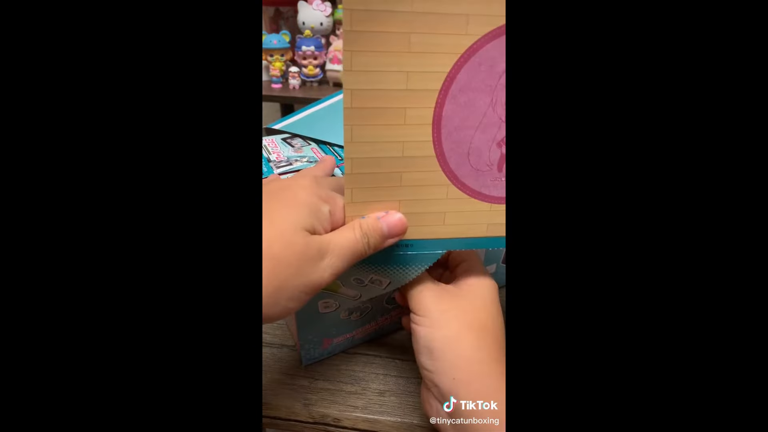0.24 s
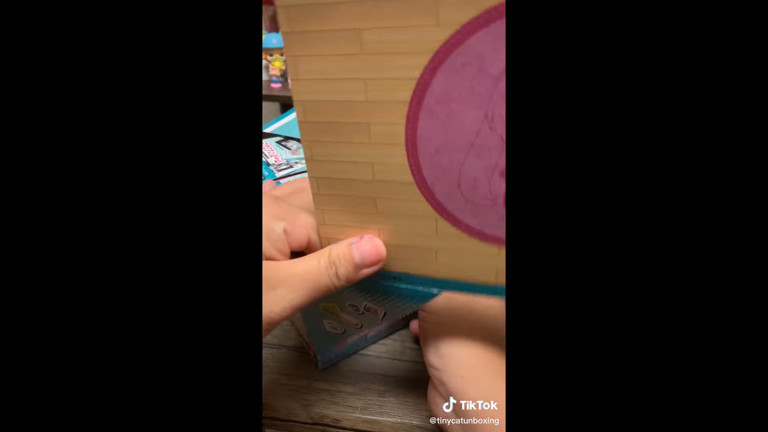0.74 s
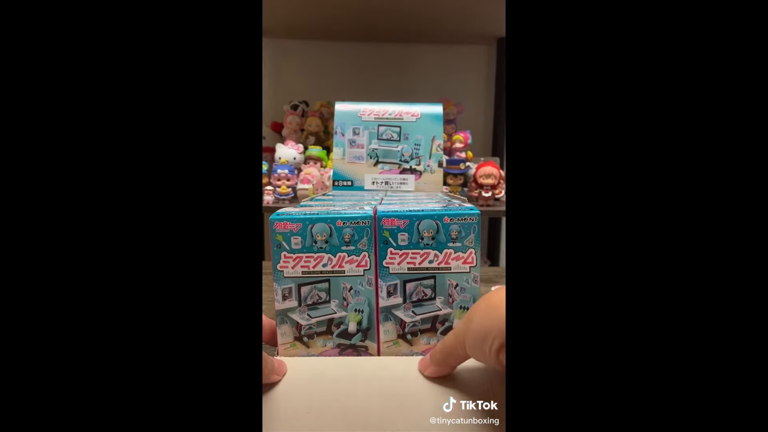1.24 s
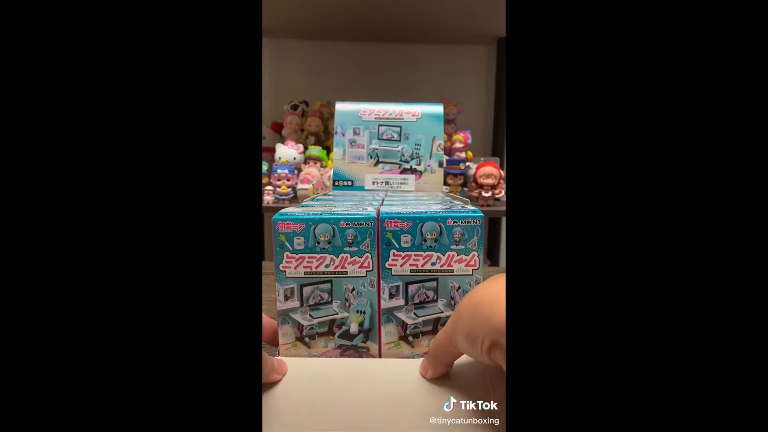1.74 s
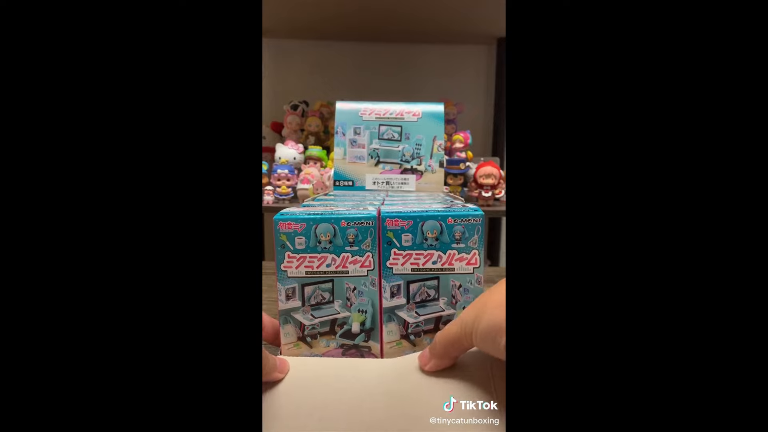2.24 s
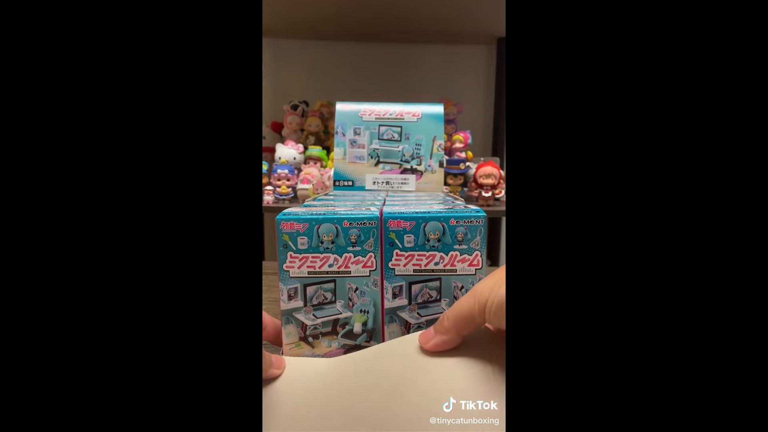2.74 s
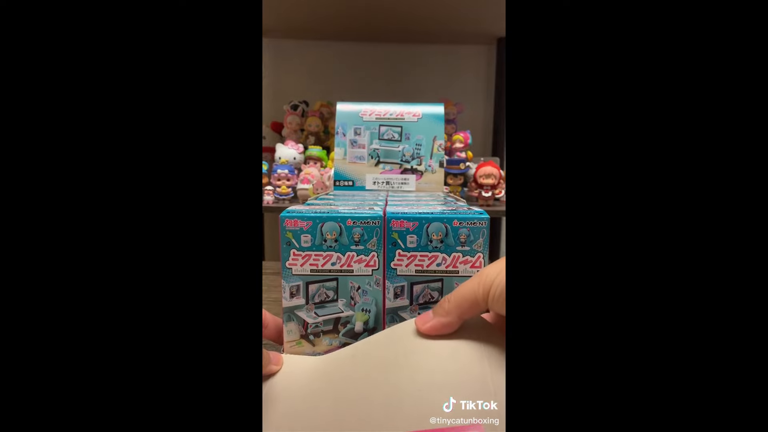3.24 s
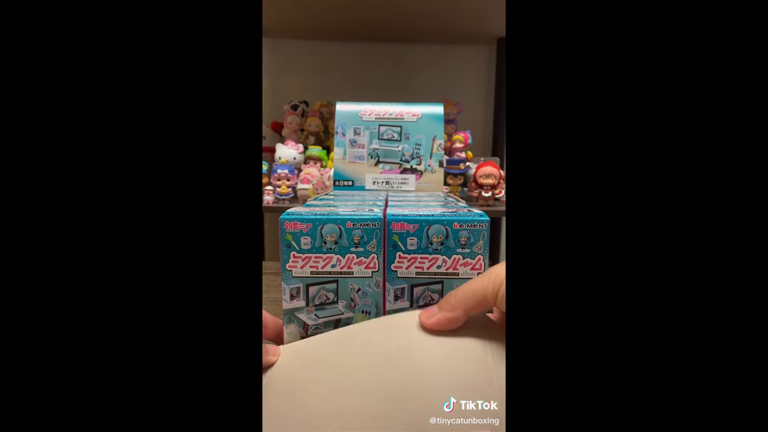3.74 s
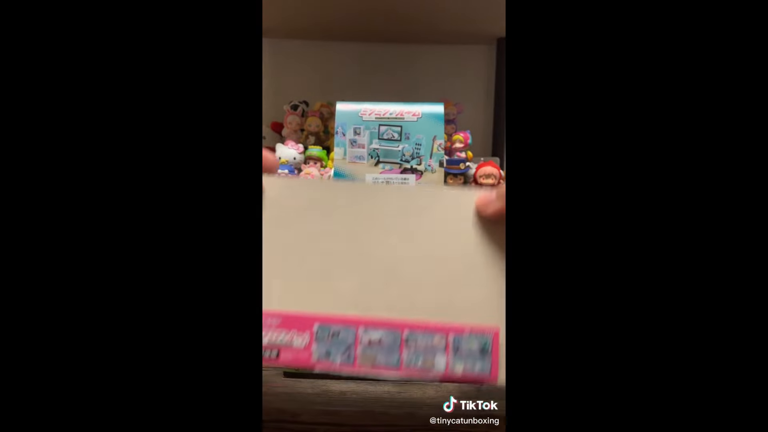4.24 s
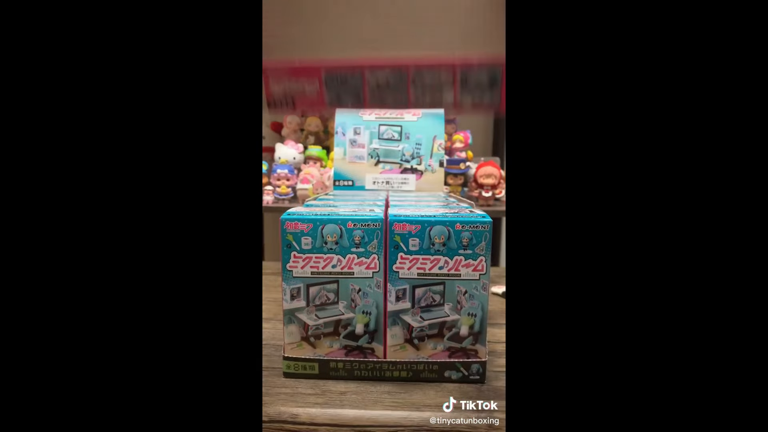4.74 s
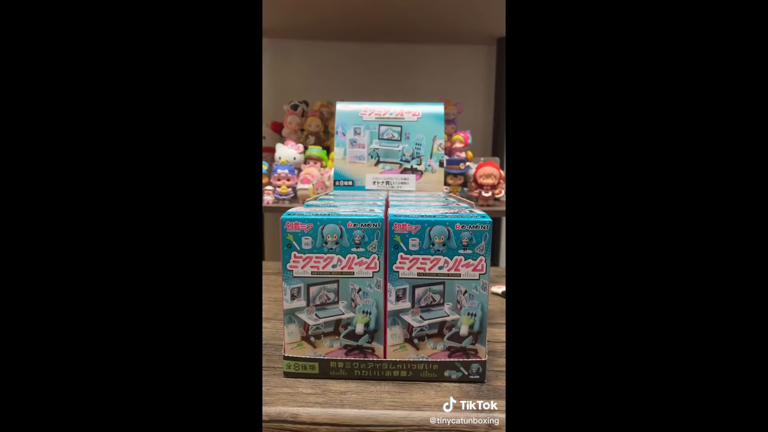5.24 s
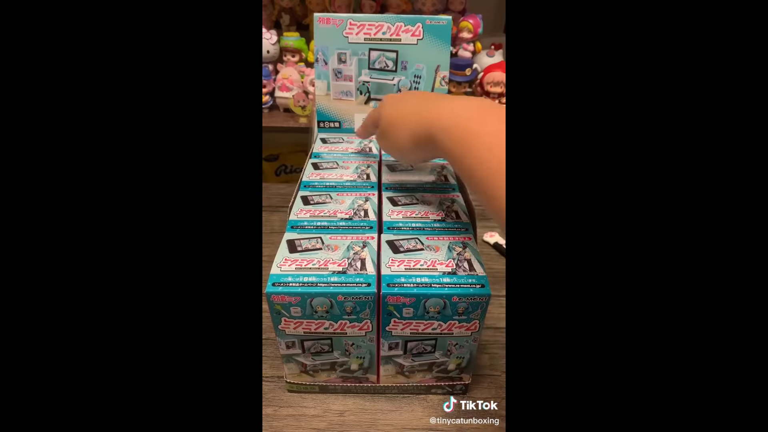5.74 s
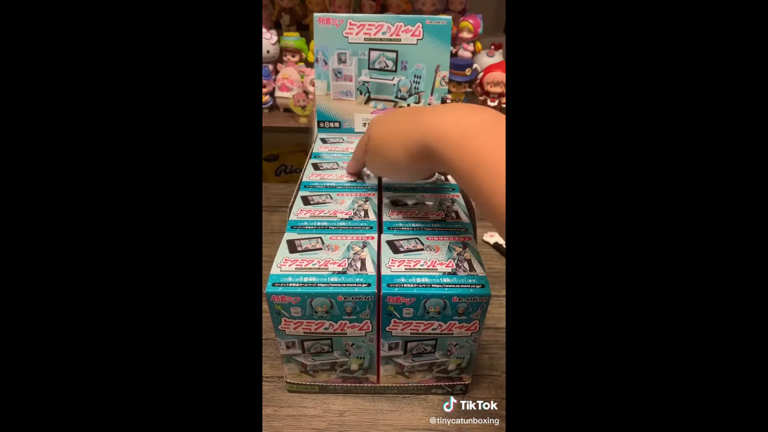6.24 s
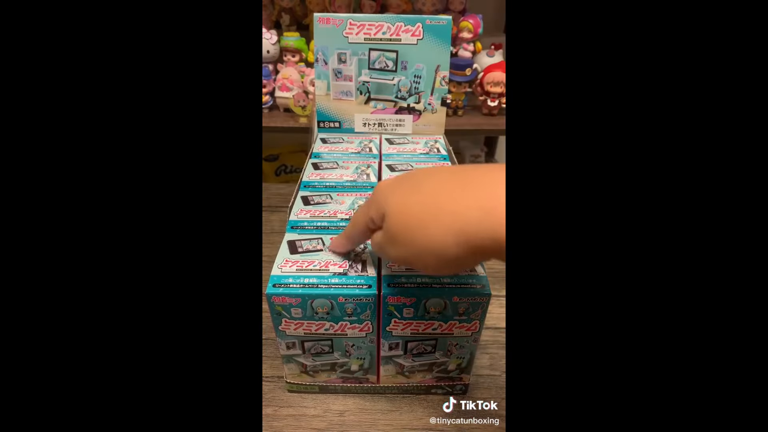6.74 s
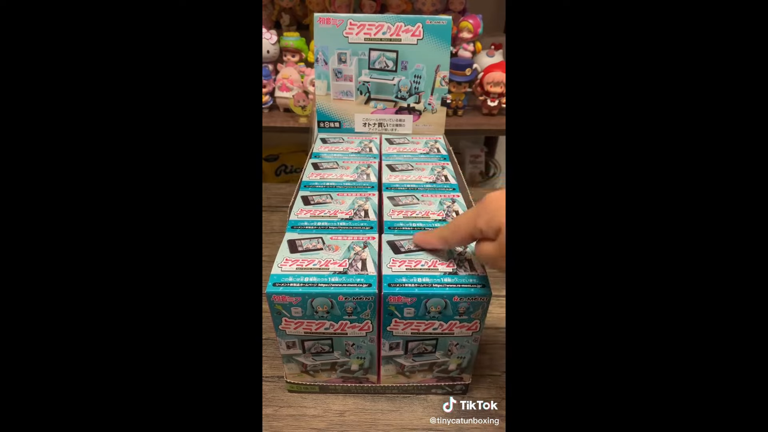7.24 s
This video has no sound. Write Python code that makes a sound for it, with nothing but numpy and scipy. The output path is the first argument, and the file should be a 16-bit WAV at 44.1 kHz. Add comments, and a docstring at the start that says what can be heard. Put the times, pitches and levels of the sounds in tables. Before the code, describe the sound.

Hands open a stiff cardboard box on a table. A brief crackling tear gives way to a lull, then irregular bursts of bright, woody snaps, loudest near the middle, with skin scraping on card between them. Then much quieter handling, tiny knocks on hollow cartons, and a thin uneven hiss of a finger drawn across their lids. Recorded close in stereo in a small, fairly dead room with low rumble.

```python
"""At a table in a small furnished room, fingers tear the perforated front off a cardboard box, tab by tab.
Each tab is a short noise burst that rings the stiff card, cracks brightly and thumps the panel.
Skin and card rub softly as coloured, grainy noise; now and then fingers knock on small hollow cartons.
Near the end a fingertip slides over the carton tops. Low rumble and a faint hiss lie underneath."""
import sys
import numpy as np
from scipy import signal
from scipy.fft import rfft, irfft
from scipy.io import wavfile
from scipy.ndimage import uniform_filter1d, map_coordinates

SR = 44100
rng = np.random.default_rng(int(sys.argv[2]) if len(sys.argv) > 2 else 0)


def generate_wav(signal):
    """Clip the signal to [-1, 1] and save it as 16-bit WAV at the path in sys.argv[1]."""
    frames = np.transpose(np.atleast_2d(signal))
    scaled = np.clip(frames, -1, 1) * 32767
    pcm = np.round(scaled).astype(np.int16)
    wavfile.write(sys.argv[1], SR, pcm)


N = 330750
SIDES = np.array([[1], [-1]])  # left, right


def undb(db):
    """Turns decibels into a plain factor."""
    return 10 ** (np.asarray(db) / 20)


def peak(x):
    """Scales a sound so that its highest peak is 1."""
    return x / np.abs(x).max()


def unit(x):
    """Scales a sound to an average (RMS) level of 1."""
    return x / np.sqrt(np.mean(x ** 2))


def add(out, start_s, sound):
    """Mixes a sound into the scene; what lies before the beginning or after the end is cut."""
    start = int(start_s * SR)
    sound = np.atleast_2d(sound)[:, max(-start, 0):N - start]
    first = max(start, 0)
    out[:, first:first + sound.shape[1]] += sound


def colour(x, table, share=1):
    """Weights the spectrum by (Hz, dB) points, joined by straight lines over log frequency."""
    table_hz, table_db = np.transpose(table)
    length = x.shape[-1]
    hz = np.maximum(np.arange(length // 2 + 1) * SR / length, 1)
    gain_db = np.interp(np.log(hz), np.log(table_hz), table_db)
    return irfft(rfft(x) * undb(share * gain_db), length)


def ring(x, hz, width_hz):
    """A resonance that passes its own pitch with gain 1."""
    return signal.lfilter(*signal.iirpeak(hz, hz / width_hz, fs=SR), x)


def steep(x, hz, width_hz):
    """The same resonance twice, which leaves dark valleys beside it."""
    return ring(ring(x, hz, width_hz), hz, width_hz)


def walk(rate):
    """Wandering random levels, rate new ones a second, smoothed twice; their spread is near 1."""
    hold = int(SR / rate)
    steps = np.repeat(rng.standard_normal(N // hold + 1), hold)
    return 1.3 * uniform_filter1d(uniform_filter1d(steps, hold), hold)[:N]


def curves(table):
    """Draws each level column against the seconds in the first; outside them it is -120 dB."""
    s, *columns = np.transpose(table)
    return [np.interp(np.arange(N) / SR, s, c, left=-120, right=-120) for c in columns]


# What differs between the two microphone ports.
# Each row: frequency in Hz, level in dB against the sound they share.
PORT_DIFFERENCE = [(300, -10), (1500, -5.5), (2900, -2.5), (3600, -4), (4500, -3), (6900, -11.5),
                   (9000, -1.5), (13000, -3)]


def pair(mid, side):
    """Left and right from two unrelated signals: alike in the bass, further apart in the treble."""
    return mid + SIDES * colour(side, PORT_DIFFERENCE)


def noise(table):
    """Steady stereo noise of a given colour, at an average level of 1."""
    mid, side = colour(rng.standard_normal((2, N)), table)
    return unit(pair(mid, side))


# Colour of the low rumble. Each row: frequency in Hz, strength in dB per Hz.
HUM_COLOUR = [(15, -39.5), (25, -13), (65, -5.5), (91, -21), (124, -17.5), (160, -35.5), (198, -25.5),
              (254, -39.5), (500, -60), (650, -93), (1100, -120)]
# Loudness of the rumble. Each row: time in seconds, level in dB.
HUM_LEVEL = [(0.0, -67), (0.19, -54.5), (0.6, -63.5), (1.15, -55), (2.28, -56), (2.57, -50), (2.94, -58.5),
             (3.34, -56.5), (4.16, -64), (4.61, -59), (5.22, -60.5), (5.83, -65), (7.33, -63.5), (7.5, -59)]
# Colour of the faint steady hiss. Each row: frequency in Hz, strength in dB per Hz.
AIR_COLOUR = [(290, -38), (500, -10), (659, -9.5), (1790, -4), (6230, -5), (9920, -14), (12700, -3),
              (15600, -12), (16000, -49.5)]
AIR_DB = -82.5


def hum():
    """Low rumble of the house and the table, as noise of changing level, over a faint steady hiss."""
    hum_db = np.interp(np.arange(N) / SR, *np.transpose(HUM_LEVEL))
    return noise(HUM_COLOUR) * undb(hum_db) + noise(AIR_COLOUR) * undb(AIR_DB)


# Echoes of the room, band by band.
# Each row: centre in Hz, seconds to fade by 60 dB, level in dB.
ROOM_BANDS = [(152, 0.18, -8), (435, 0.13, -4), (1000, 0.18, -12), (1840, 0.12, -19), (3307, 0.14, -13),
              (6600, .12, -18.5), (11200, 0.067, -12.5)]


def room(x):
    """Dense echoes, made of noise that fades band by band, partly different at the two ports."""
    t = np.arange(16384) / SR
    echoes = pair(*rng.standard_normal((2, len(t)))) * (1 - np.exp(-t / 0.00033))
    tail = 0
    for hz, t60, db in ROOM_BANDS:
        fade = 1000 ** (-t / t60)
        tail = tail + undb(db) * ring(echoes, hz, 0.72 * hz) * fade / np.sqrt(np.sum(fade ** 2))
    mono = x.mean(axis=0, keepdims=True)
    return signal.fftconvolve(mono, tail, axes=1)[:, :N]


PATCH_DB, PATCH_S, PATCH_OCTAVES = 3.5, 0.084, 0.15  # spread in the bass, and size, of the colour patches
PATCH_TOP_HZ = 3520  # around and above this the spread shrinks


def patchy(x):
    """Narrow bands of the rubbing and of the echoes swell and sink at random."""
    hz, s, spectrum = signal.stft(x, SR, nperseg=512)
    grid = np.meshgrid(np.log2(1 + hz / 100) / PATCH_OCTAVES, s / PATCH_S, indexing="ij")
    patches = map_coordinates(rng.standard_normal((64, 256)), grid, mode="mirror")
    spread_db = PATCH_DB / np.sqrt(1 + (hz[:, None] / PATCH_TOP_HZ) ** 2)
    return signal.istft(spectrum * undb(spread_db * patches), SR, nperseg=512)[1][:, :N]


# The freed card rustles on after each snap; the rows are hiss, scrape and panel drone.
# Each row: level in dB against the snap's treble, card ring or thump, seconds to fade by 60 dB.
SETTLE_FADES = [(-31, 0.18), (-30, 0.27), (-15, 0.13)]


def settling():
    """Levels of three colours dying away after every snap; a bright snap leaves a bright rustle."""
    kicks = np.zeros((3, N))
    for s, db, treble_db, *_, thump_db, _ in SNAP_EVENTS:
        kicks[:, int(s * SR)] += undb([db + treble_db, db, db + thump_db]) ** 2
    levels = []
    for kick, (db, t60) in zip(kicks, SETTLE_FADES):
        power = signal.lfilter([1], [1, -1000 ** (-2 / (t60 * SR))], kick)
        levels.append(undb(db) * np.sqrt(power))
    return np.array(levels)


SCUFF_EDGE_DB, SCUFF_ROUND = -24, 1.136  # level at the ends of swell and fade; 1 pointed, 2 rounded top
HOLLOW_WIDTH, HOLLOW_REF_HZ = .42, 1500  # width as a share of this pitch; higher rings are looser
# Hands shifting on the card, with levels before the grain of the rubbing is added.
# Each row: loudest moment in seconds, swell in seconds, fade in seconds, scrape in dB, hiss in dB,
# panel drone in dB, hollow ring in Hz, hollow ring in dB.
SCUFF_EVENTS = [(.03, 0.044, 0.095, -91, -64.5, -47, 1020, -53),
                (.22, 0.19, 0.19, -54.5, -53.5, -58, 808, -52),
                (0.348, 0.11, 0.16, -81, -104, -47, 733, -60.5),
                (0.599, 0.1, 0.38, -69, -68, -96, 2110, -70.5),
                (0.703, 0.057, 0.063, -55.5, -56, -50.5, 2030, -64),
                (0.834, 0.07, 0.074, -59, -93, -62, 1700, -76),
                (1.02, 0.11, 0.12, -68.5, -62.5, -79, 1940, -64.5),
                (1.098, 0.04, 0.0063, -66, -84, -58, 1535, -80),
                (1.17, 0.034, 0.026, -79, -66, -71, 1590, -71),
                (1.24, 0.033, 0.09, -90, -101, -65, 1840, -72),
                (1.361, 0.053, 0.081, -48, -45.5, -44, 1570, -57.5),
                (1.694, 0.17, 0.35, -66, -65, -64, 850, -67),
                (1.822, 0.078, 0.015, -55.5, -60, -51.5, 840, -63),
                (2.173, 0.023, 0.022, -61, -56.5, -60.5, 2450, -74),
                (2.223, 0.032, 0.011, -53.5, -56, -54.5, 978, -76),
                (2.399, 0.056, 0.078, -63, -60, -58.5, 2350, -73.5),
                (2.635, 0.0093, 0.051, -56, -60, -57, 1220, -65),
                (2.828, 0.056, 0.11, -76, -88, -68.5, 1308, -69),
                (3.16, 0.21, 0.41, -64.5, -73, -73.5, 2348, -80),
                (3.371, 0.09, 0.097, -67.5, -76.5, -74, 1680, -70),
                (3.638, 0.023, 0.14, -63.5, -64.5, -57, 1460, -70),
                (3.75, 0.14, 0.11, -68, -57, -73.5, 1495, -68),
                (3.846, .016, .03, -91, -100, -69, 812, -64),
                (3.935, 0.21, 0.059, -67.5, -73, -74, 1064, -66.5),
                (4.058, 0.045, 0.047, -68.5, -78, -59.5, 1450, -60.5),
                (4.145, 0.013, 0.049, -82, -99, -66, 1720, -72),
                (4.349, 0.022, 0.066, -69, -80, -62.5, 1720, -63),
                (4.455, 0.043, 0.08, -63, -66, -58.5, 823, -69),
                (4.539, 0.072, 0.02, -67.5, -69, -88, 1570, -62.5),
                (4.61, 0.018, 0.04, -95, -91, -70, 1584, -74),
                (5.08, .015, 0.037, -87.5, -73.5, -80, 1682, -95),
                (5.28, 0.27, 0.027, -67.5, -72.5, -67, 1620, -74),
                (5.418, 0.015, 0.13, -58, -89, -57, 3770, -57.5),
                (5.56, 0.0093, 0.12, -55.5, -87, -59.5, 4000, -54.5),
                (5.733, 0.03, 0.088, -65, -88.5, -56.5, 952, -73)]


def scuffs():
    """Each scuff swells and fades: three noise levels, and noise ringing the gap under the hand."""
    t, levels, hollow = np.arange(N) / SR, np.zeros((3, N)), np.zeros((2, N))
    air = pair(*rng.standard_normal((2, N)))
    for s, swell_s, fade_s, scrape_db, hiss_db, drone_db, hz, hollow_db in SCUFF_EVENTS:
        near = slice(max(int((s - 4 * swell_s) * SR), 0), int((s + 4 * fade_s) * SR))
        away = np.maximum((s - t[near]) / swell_s, (t[near] - s) / fade_s)
        shape = undb(SCUFF_EDGE_DB * away ** SCUFF_ROUND)
        levels[:, near] += undb([[hiss_db], [scrape_db], [drone_db]]) * shape
        width_hz = HOLLOW_WIDTH * hz ** 2 / HOLLOW_REF_HZ
        hollow[:, near] += undb(hollow_db) * shape * unit(steep(air[:, near], hz, width_hz))
    return levels + settling(), hollow


TICKS_PER_S, TICK_S, TICK_DB = 180, 0.0018, -5  # fibres that catch and let go
# Colours of the hiss, the scrape and the panel drone. Each row: frequency in Hz, strength in dB per Hz.
RUSTLE_COLOUR = [(2940, -33), (5000, -5), (7100, -2.5), (9880, -12), (11200, -4), (15800, -17.5),
                 (16100, -50.5)]
SCRAPE_COLOUR = [(290, -45.5), (500, -7.5), (1130, -7.5), (1290, -9), (1710, -0.5), (2180, -6.5),
                 (4800, -14), (5520, -14), (8000, -20), (10400, -37.5), (17600, -120)]
DRONE_COLOUR = [(70, -6.5), (130, 2.5), (350, 0), (500, -11), (900, -38)]


def rub():
    """Skin on card hisses and scrapes; catches and ticks make it grainy; the panel drones along."""
    catches = undb(.5 * walk(51) + 1.5 * walk(250))
    chance, strength = rng.random((2, N))
    tick_starts = (chance < TICKS_PER_S / SR) * strength ** 2
    ticks = signal.lfilter([1], [1, -np.exp(-1 / (TICK_S * SR))], tick_starts)
    (hiss, scrape, drone), hollow = scuffs()
    bright = hollow + hiss * noise(RUSTLE_COLOUR) + scrape * noise(SCRAPE_COLOUR)
    return catches * (bright * (1 + undb(TICK_DB) * ticks) + drone * noise(DRONE_COLOUR))


SKIN_DRIFT_DB, SKIN_PAN_DB = 2, -3  # each band comes and goes; left minus right
CARTON_DB = 2.5  # carton drone against the lid rub
# Colours of the hiss and of the lid rub. Each row: frequency in Hz, strength in dB per Hz.
HISS_COLOUR = [(1470, -47), (2500, -16.5), (4080, -8.5), (6970, 0), (8870, -6), (9660, -12.5),
               (11000, -2.5), (13900, -5), (15700, -13.5), (16100, -43)]
LID_COLOUR = [(400, -14), (720, 2.5), (1000, -5), (1400, -16.5)]
# Bands in which the skin catches. Each row: centre in Hz, width in Hz, level in dB before it drifts.
SKIN_BANDS = [(1250, 600, -6.5), (1750, 1200, 6), (2300, 1100, -4.5), (3170, 1300, -2)]
# One finger drawn over the carton tops, with levels before they flicker.
# Each row: time in seconds, hiss in dB, scrape of the skin in dB, lid rub in dB.
SLIDE_LEVELS = [(5.84, -81.5, -76, -85), (5.974, -66, -73.5, -92), (6.0, -62.5, -70, -76.5),
                (6.182, -64.5, -74, -93), (6.334, -60.5, -72.5, -85.5), (6.436, -61.5, -81, -102),
                (6.486, -66, -75, -71.5), (6.556, -64.5, -73.5, -88.5), (6.672, -62.5, -75.5, -73),
                (6.81, -59, -83, -76), (6.884, -76, -74, -69.5), (6.922, -56.5, -82, -69.5),
                (6.994, -62, -84, -80), (7.064, -58, -73, -78.5), (7.162, -65.5, -84, -87),
                (7.23, -56, -74.5, -100), (7.406, -58.5, -72, -72), (7.5, -59.5, -76, -93)]


def slide():
    """A fingertip on glossy lids: a more even hiss, while the lower colours come and go."""
    hiss_db, skin_db, lid_db = curves(SLIDE_LEVELS)
    air = pair(*rng.standard_normal((2, N)))
    bands = [undb(db + SKIN_DRIFT_DB * walk(11)) * steep(air, hz, w) for hz, w, db in SKIN_BANDS]
    skin = unit(sum(bands)) * undb(SIDES * SKIN_PAN_DB / 2)
    # sound, level in dB, flicker in dB
    layers = [(noise(HISS_COLOUR), hiss_db, 1.5),
              (skin, skin_db, 2.5),
              (noise(LID_COLOUR), lid_db, 3.3),
              (noise(DRONE_COLOUR), lid_db + CARTON_DB, 3.2)]
    grain = undb(1.2 * walk(300))
    return grain * sum(undb(db + flicker * walk(33)) * sound for sound, db, flicker in layers)


PANEL_SAG, PANEL_SAG_CYCLES = 0.25, 0.35  # share by which the pitch starts high, and for how many swings


def thud(hz, t60, t, swell_s):
    """A panel is pushed and swings out, its pitch sagging; part of the swing dies much sooner."""
    turns = hz * t + PANEL_SAG * PANEL_SAG_CYCLES * (1 - np.exp(-hz * t / PANEL_SAG_CYCLES))
    slow_fade = 1000 ** (-t / t60)
    quick_fade = 1000 ** (-t / (0.14 * t60))
    swell = (1 - np.exp(-t / swell_s)) ** 2
    return np.sin(2 * np.pi * turns) * (slow_fade + undb(-2.5) * quick_fade) * swell


CARTON_SWELL_S, CARTON_T60_S = 0.0042, 0.078  # how fast the boom gathers, and its time to fade by 60 dB
# Fingers that knock on cartons.
# Each row: start in seconds, peak of the boom in dB, click in dB against the boom,
# pitch the carton settles at in Hz, fade of the contact in ms (to about a third).
TAP_EVENTS = [(0.327, -35, -9.5, 250, 28), (0.353, -39, -14, 302, 3.7), (0.667, -49, 3.5, 100, 16),
              (0.997, -36.5, -49, 90.7, 9.8), (3.631, -52, 5.5, 288, 4.3), (3.861, -58, 7.5, 265, 11),
              (4.03, -62.5, 9.5, 95, 5.9), (4.135, -56.5, -5.5, 110, 6), (4.338, -63.5, 5, 101.3, 6.4),
              (4.373, -59.5, -6, 151, 7.2), (4.438, -56, 9.5, 100, 13), (5.072, -61, -8, 98.3, 6.3),
              (5.41, -62, 6.5, 180, 33), (5.555, -53, 3, 268, 10), (5.727, -50.5, 2.5, 279, 7),
              (6.008, -68, 7, 152.3, 7.2), (6.228, -51.5, -22, 329, 7), (6.485, -59, 1, 347.4, 13),
              (6.914, -61, 2, 97.4, 9.4)]


def taps():
    """A fingertip booms a hollow carton; the contact adds a dull, grainy scuff of ringing noise."""
    out, t = np.zeros((2, N)), np.arange(8192) / SR
    for s, db, click_db, hz, ms in TAP_EVENTS:
        touch = rng.standard_normal(len(t)) * (1 - np.exp(-t / 0.00029)) * np.exp(-t * 1000 / max(ms, .3))
        click = ring(touch, 1380, 550) + undb(-29) * ring(touch, 5400, 2000) + undb(0.5) * ring(touch, 980, 340)
        boom = thud(hz, CARTON_T60_S, t, CARTON_SWELL_S)
        add(out, s, undb(db) * (peak(boom) + undb(click_db) * peak(click)))
    return out


LEAD_S = .02  # the faint noise begins this long before the burst
LEAD_IN_DB, LEAD_IN_S = -21, .007  # faint noise that swells into the burst
FRAY_DB, FRAY_S = -24, .008  # loose fibres after the break
RISE = .7  # swell of the burst against its fade
GRIT_DB, GRIT_S = 1, .0004  # spread and length of the single fibres in the burst
FIRST_DB, CRACK_FIRST_DB = 17, 3.5  # the main break, for the card ring and for the crack
SNAP_SIDE_DB = -14.5  # a snap is close and small: the ports hear it more alike
CARD_WIDTH_HZ = 410
MODE_SHIFT, MODE_SPREAD_DB = .07, 3  # random spread of mode pitch (as a share) and level
PANEL_LATE, PANEL_SWELL = .35, .5  # swings that pass before the panel moves, and while it gathers way
PANEL_CYCLES = 4.7  # swings until the panel has faded by 60 dB
# Side modes of the card, then the bright crack of fibres, before their random spread.
# Each row: centre in Hz, width in Hz, level in dB.
CARD_MODES = [(597, 490, -14.5), (2487, 570, -13.5), (3500, 1100, -22.5)]
FIBRE_MODES = [(6018, 1000, 12), (8400, 920, -8), (11200, 3900, -8.5)]
# Perforation tabs and card edges that give way.
# Each row: moment of the break in seconds, peak of the card ring in dB, treble crack in dB against it,
# card ring in Hz, second ring in Hz, second ring in dB before the ring is scaled, fade of the burst in ms
# (at least 0.2 is used), thump in dB against the card ring, pitch the panel settles at in Hz.
SNAP_EVENTS = [(0.002, -22, -8.5, 1710, 750, 4.5, 3.8, -6, 290),
               (0.0142, -26, -17, 1850, 2300, -7.5, 1.7, 0, 268),
               (0.1118, -41, 0.5, 1720, 2570, -7.5, 1.6, -14, 340),
               (0.151, -32.5, -4, 1640, 775, -1, 3.4, -4, 260),
               (0.186, -32.5, -4.5, 1020, 3730, 0, 4.5, -9.5, 302),
               (0.191, -24, -10, 1570, 810, -2, 3.6, -5.5, 278),
               (0.198, -30, 1, 1020, 1630, 1, 4.3, -7, 320),
               (0.223, -17, -20, 800, 4020, -24, 1.1, -12, 314),
               (0.232, -28.5, 1.5, 1580, 990, -8, 2.3, 0, 254),
               (0.2395, -27.5, -0.5, 2130, 726, 3.5, 4.8, 0.5, 343),
               (0.26, -32, -2.5, 2250, 4320, -6, 2.5, -12, 110),
               (1.087, -40, -31.5, 920, 1810, -7, 1.4, -22, 151),
               (1.129, -21.5, -7, 1546, 3630, -12, 1.3, 0.5, 155),
               (1.3247, -15, 0, 2300, 985, -1.5, 1.7, -15.5, 238),
               (1.338, -22.5, -0.5, 2190, 1000, -14, 1.8, -9.5, 267),
               (1.362, -21.5, -13, 1850, 900, 2, 1, -21, 280),
               (1.378, -10, -12, 1680, 3000, -19, 0.18, -16, 208.5),
               (1.387, -30, -12.5, 780, 2140, 1.5, 3.1, -23, 237),
               (1.407, -17.5, -13, 1750, 5370, -18.5, 1.6, -16, 255),
               (1.67, -39, -22, 840, 1970, -2, 0.61, -12.5, 270),
               (1.828, -39.5, -8, 810, 1529, -3.5, 1.7, 0, 134),
               (1.904, -24.5, -6.5, 1910, 1356, -9, 1.7, -13, 303.6),
               (1.9361, -15, -12.5, 1990, 766, -2.5, 0.51, -11.5, 360.5),
               (1.944, -6.5, -6, 1810, 755, -8.5, 0.33, -20, 246),
               (1.9746, -14, -2.5, 1930, 907.6, -1, .5, -12, 265),
               (1.9993, -13, -3, 2060, 780, 0, 1.35, -7.5, 220),
               (2.039, -37.5, 1.5, 1890, 892, -7, 2, 4.5, 355.5),
               (2.17, -44.5, -1.5, 1847, 860, -2, 0.83, -12, 108.5),
               (2.241, -10, -4, 2020, 1016, 2, 1.8, -5, 354.4),
               (2.255, -10, -7, 1810, 1087, -7, 1.75, -10, 219.7),
               (2.4137, -29.5, -5.5, 2270, 884, -5, 2.3, -0.5, 344.6),
               (2.452, -4, -5, 1810, 990, -4.5, 1.85, -13.5, 157.9),
               (2.473, -22, -11, 1750, 1140, -2, 2.8, -7.5, 250.7),
               (2.4866, -13.5, -16, 1750, 1160, -10, 1.1, -12, 184.3),
               (2.504, -15.5, -3, 1670, 1097, 1.5, 0.44, -7, 190),
               (2.5386, -11, -10, 1995, 1170, -5.5, 1.33, -14, 175),
               (2.693, -13.5, -6.5, 2050, 1046, -2.5, 0.49, -15, 195),
               (2.9383, -6, -6, 2090, 1118, -4.5, 0.78, -14.5, 177),
               (3.192, -3, -8, 1795, 952, -6.5, 1.83, -20.5, 142.2),
               (3.194, -10, -3, 905, 2045, 4, 0.65, -6, 127.7),
               (3.397, -7, -15.5, 1660, 3550, -15.5, 2.46, -25, 134.9),
               (3.4031, -7.5, -12.5, 1500, 3760, -1, 1.2, -14, 129.6),
               (3.405, -13.5, -15.5, 2300, 765, -4.5, 1.6, -14, 127.7),
               (3.719, -38.5, -8, 1640, 1210, 1, 0.81, -13, 284),
               (3.729, -36.5, -7, 1658, 2850, -24, .5, -15, 101.7),
               (4.454, -48.5, -8, 1250, 1990, -3, 2.5, -26, 170),
               (4.5416, -43.5, 1.5, 1637, 3660, -3, 0.71, -16, 149.5),
               (5.726, -57, -4.5, 2347, 4900, 2, 1.8, 7, 273.3),
               (5.7366, -47, -2.5, 2030, 4120, 0, 1.2, -20, 278)]


def snaps():
    """A faint noise swells into each gritty burst, which rings the card; the panel swings back."""
    out, t = np.zeros((2, N)), np.arange(8192) / SR - LEAD_S
    lead_in = undb(LEAD_IN_DB) * np.exp(-abs(t) / LEAD_IN_S)
    loose = undb(FRAY_DB) * np.exp(-abs(t) / FRAY_S)
    around = np.where(t < 0, lead_in, loose) * np.minimum(np.arange(len(t)) / 200, 1)
    first = np.arange(len(t)) == int(LEAD_S * SR)  # a single click at the break
    fibre = (np.arange(len(t)) / (GRIT_S * SR)).astype(int)  # which fibre is parting
    base_modes = np.concatenate([CARD_MODES, FIBRE_MODES])
    for s, db, treble_db, hz, second_hz, second_db, ms, thump_db, panel_hz in SNAP_EVENTS:
        age = t * 1000 / max(ms, .2)
        mid, side, grit = rng.standard_normal((3, len(t)))
        swell_and_fade = np.where(age < 0, np.exp(-(age / RISE) ** 2), (1 + age) * np.exp(-age))
        level = undb(GRIT_DB * grit[fibre]) * swell_and_fade + around
        burst = pair(mid * level, undb(SNAP_SIDE_DB) * side * level)
        tear = burst + undb(FIRST_DB) * first
        fray = burst + undb(CRACK_FIRST_DB) * first

        # random spread of mode pitch and level, so no two snaps ring alike
        pitch_draw, level_draw = rng.standard_normal((2, len(base_modes)))
        modes = base_modes.astype(float)
        modes[:, 0] *= 1 + MODE_SHIFT * pitch_draw
        modes[:, 2] += MODE_SPREAD_DB * level_draw
        card_modes, fibre_modes = modes[:len(CARD_MODES)], modes[len(CARD_MODES):]

        card = steep(tear, hz, CARD_WIDTH_HZ) - undb(second_db) * steep(tear, second_hz, CARD_WIDTH_HZ)
        card = card + sum(undb(g) * ring(tear, f, w) for f, w, g in card_modes)
        crack = sum((-1) ** k * undb(g) * ring(fray, f, w) for k, (f, w, g) in enumerate(fibre_modes))
        panel_age = np.maximum(t - PANEL_LATE / panel_hz, 0)
        thump = thud(panel_hz, PANEL_CYCLES / panel_hz, panel_age, PANEL_SWELL / panel_hz)
        snap = peak(card) + undb(treble_db) * peak(crack) + undb(thump_db) * peak(thump)
        add(out, s - LEAD_S, undb(db) * snap)
    return out


def scene():
    """Snaps and taps with their echoes, the rubbing and the slide, over the hum."""
    hits = snaps() + taps()
    soft = room(hits) + rub() + slide()
    return hits + patchy(soft) + hum()


# Left minus right of the two microphone ports. Each row: frequency in Hz, difference in dB.
PORT_BALANCE = [(60, -0.5), (200, -1), (700, -1.5), (1500, 0), (1900, -1), (2450, -5.5), (3000, -2),
                (3700, 0), (4400, -1), (7000, 0)]
# Rippling left-right phase that spreads the top treble.
# Each row: frequency in Hz, largest phase difference in radians.
TREBLE_SPREAD = [(9500, 0), (11500, .4), (12500, 1.7)]
RIPPLE_HZ = 700  # spacing of the ripples in Hz
# Colour of the microphone. Each row: frequency in Hz, gain in dB.
MICROPHONE_COLOUR = [(8700, 0), (9700, -2.5), (10700, 0), (14500, 0.5), (16400, -10.5)]
TOP_HZ = 16500


def record(dry):
    """Two ports differ in colour; the top treble is spread, loud peaks are rounded, the top is cut."""
    left, right = colour(dry[0], PORT_BALANCE, share=.5), colour(dry[1], PORT_BALANCE, share=-.5)
    hz = np.arange(N // 2 + 1) * SR / N
    phase = np.interp(hz, *np.transpose(TREBLE_SPREAD)) * np.sin(2 * np.pi * hz / RIPPLE_HZ)
    ports = irfft(rfft(np.array([left, right])) * np.exp(.5j * SIDES * phase), N)
    ports = colour(ports, MICROPHONE_COLOUR)
    rounded = .95 * np.tanh(ports / .95)
    top_cut = signal.ellip(10, .2, 70, TOP_HZ, fs=SR, output="sos")
    return signal.sosfilt(top_cut, rounded)


dry = scene()
out = record(dry)
generate_wav(out)
```